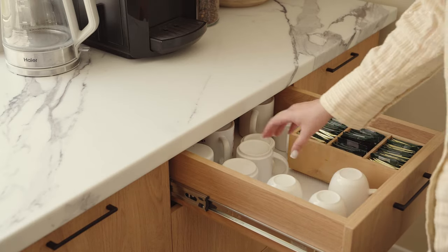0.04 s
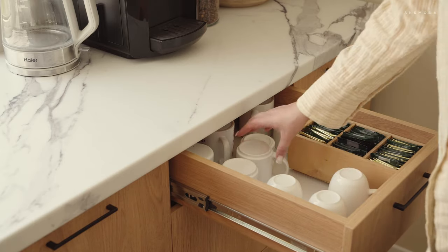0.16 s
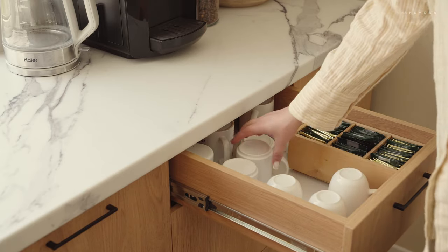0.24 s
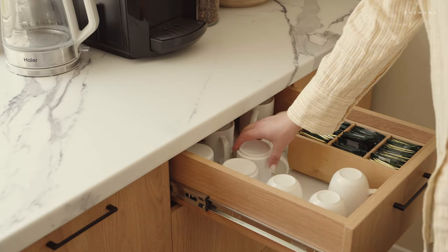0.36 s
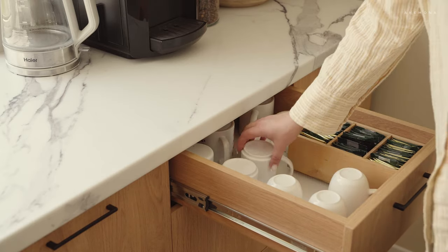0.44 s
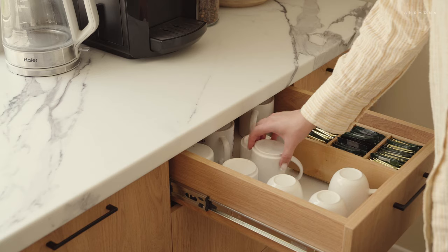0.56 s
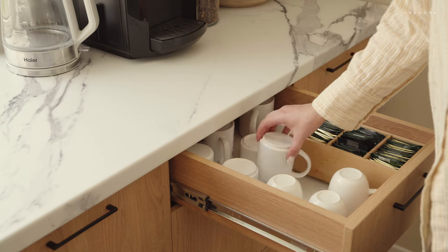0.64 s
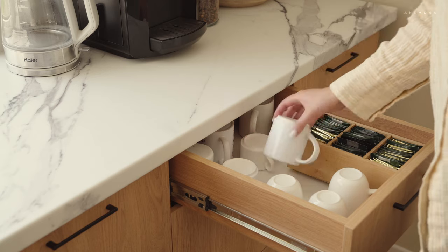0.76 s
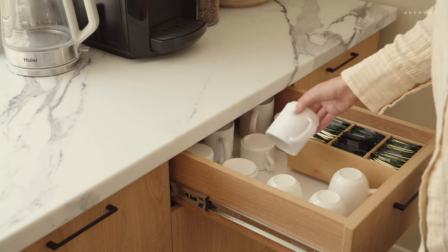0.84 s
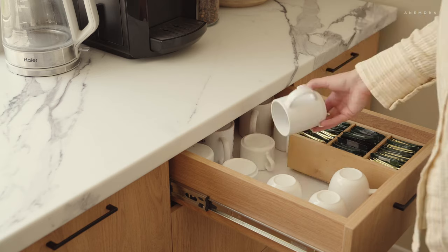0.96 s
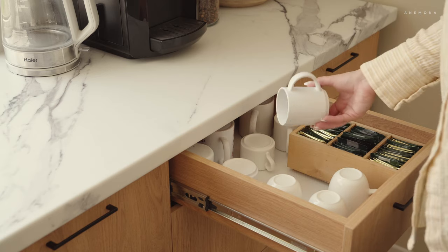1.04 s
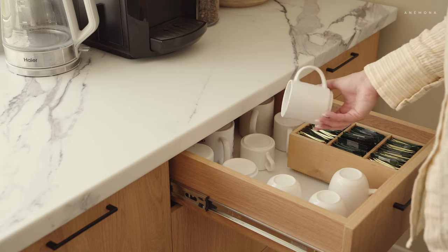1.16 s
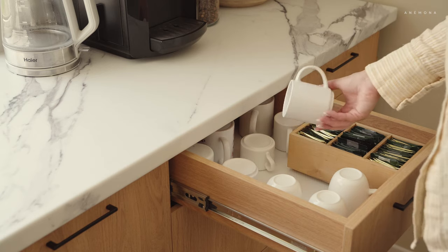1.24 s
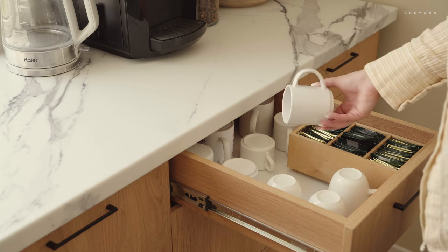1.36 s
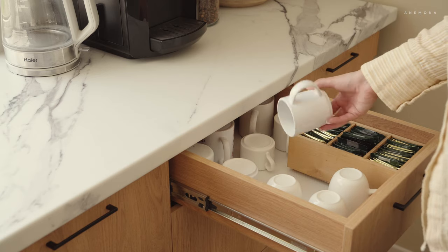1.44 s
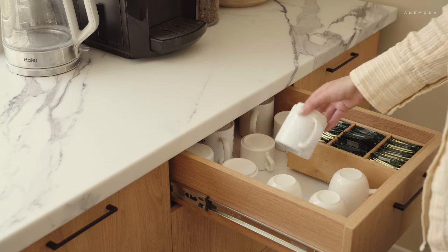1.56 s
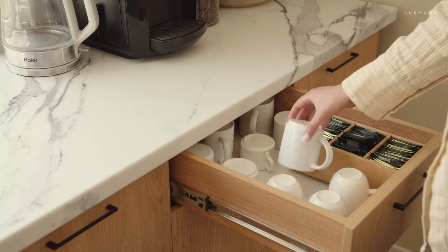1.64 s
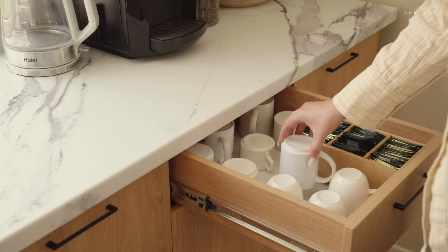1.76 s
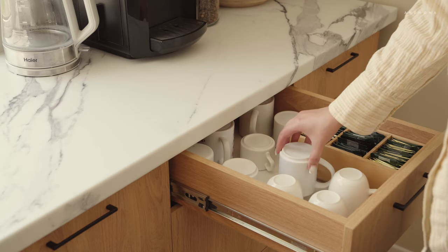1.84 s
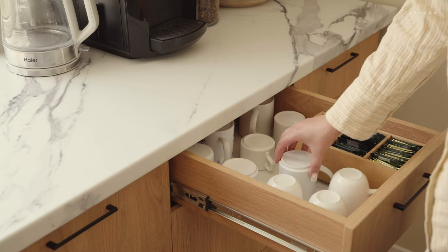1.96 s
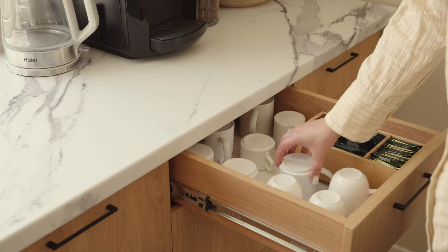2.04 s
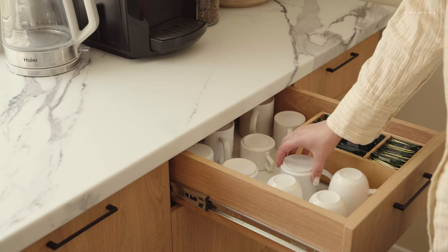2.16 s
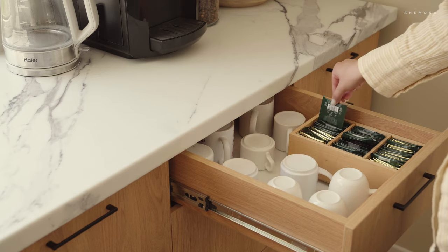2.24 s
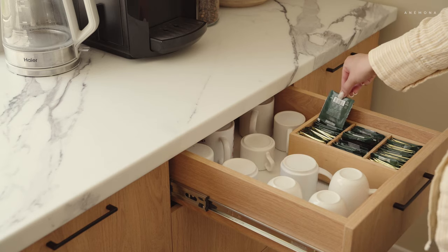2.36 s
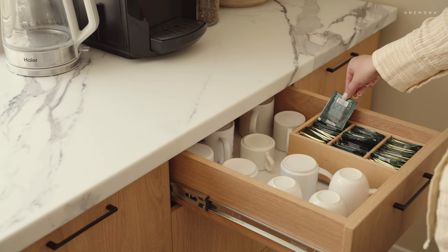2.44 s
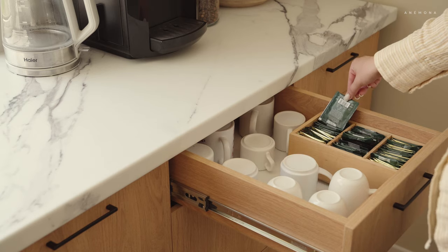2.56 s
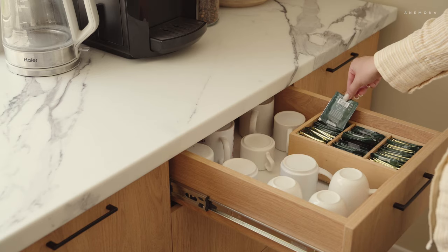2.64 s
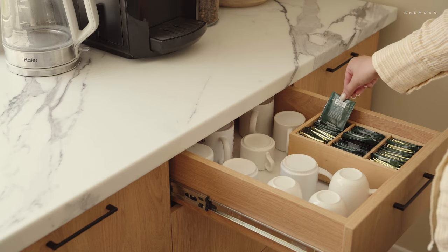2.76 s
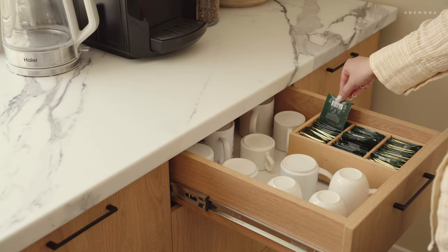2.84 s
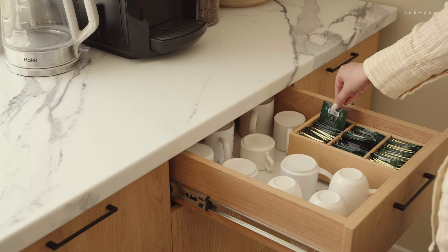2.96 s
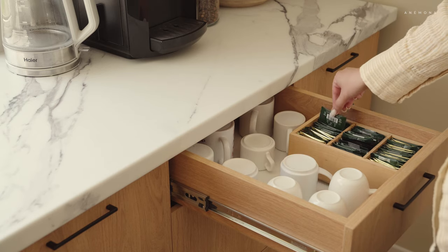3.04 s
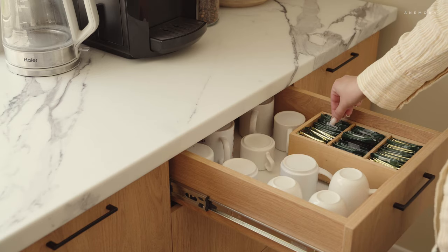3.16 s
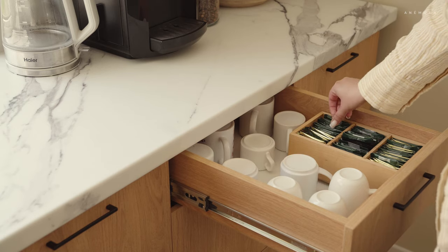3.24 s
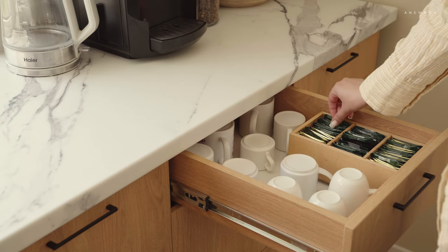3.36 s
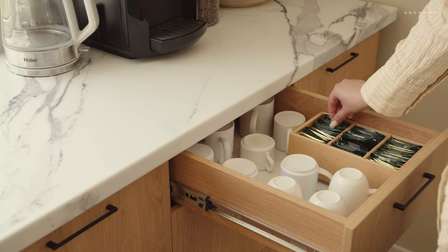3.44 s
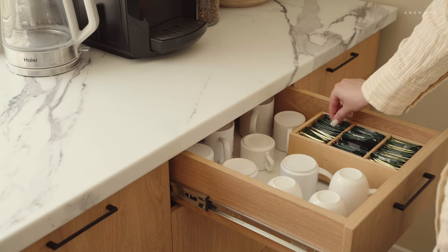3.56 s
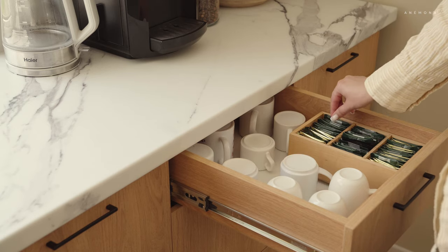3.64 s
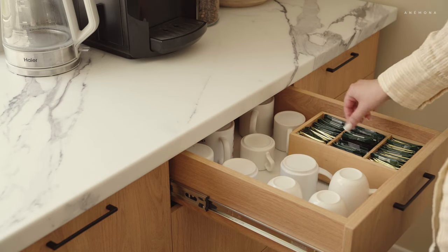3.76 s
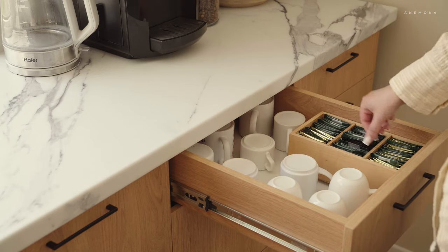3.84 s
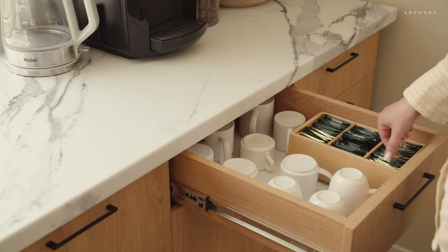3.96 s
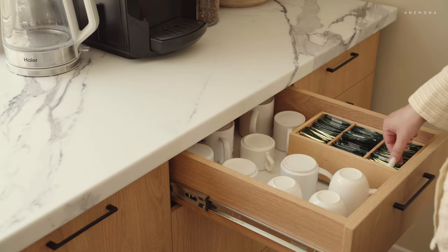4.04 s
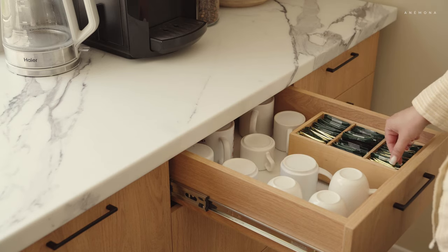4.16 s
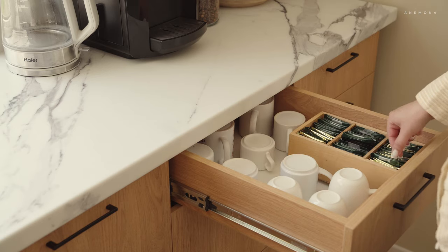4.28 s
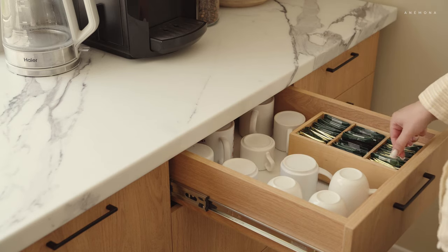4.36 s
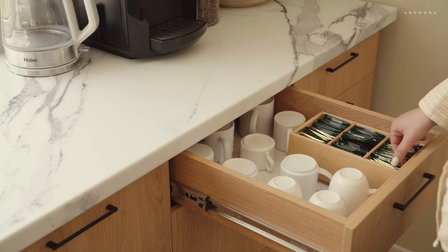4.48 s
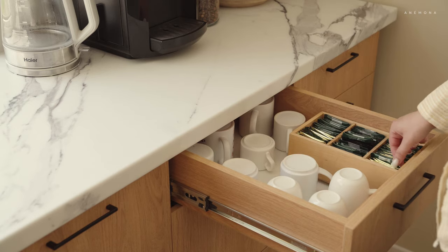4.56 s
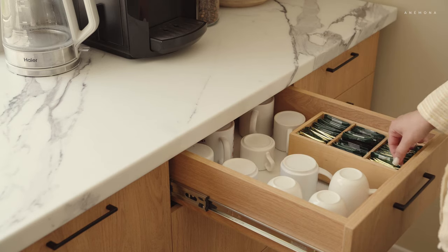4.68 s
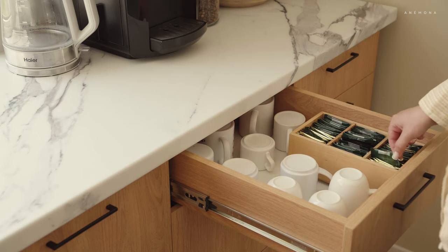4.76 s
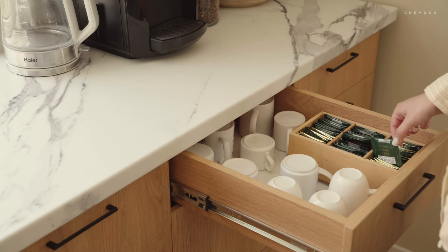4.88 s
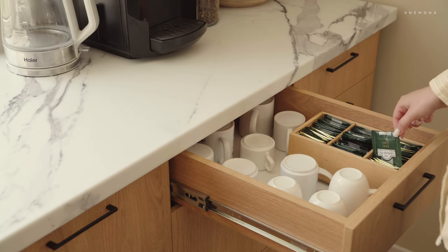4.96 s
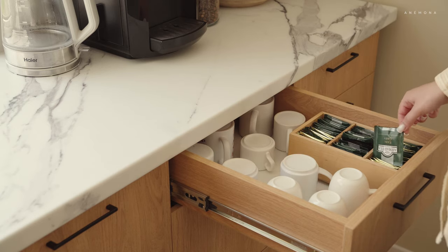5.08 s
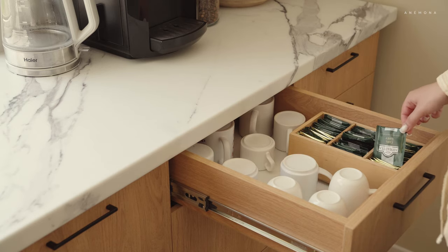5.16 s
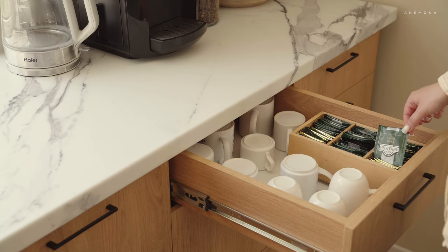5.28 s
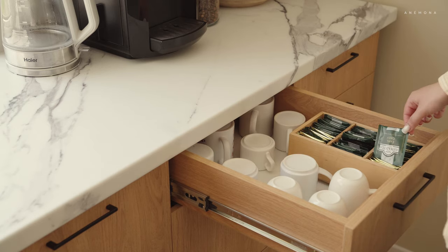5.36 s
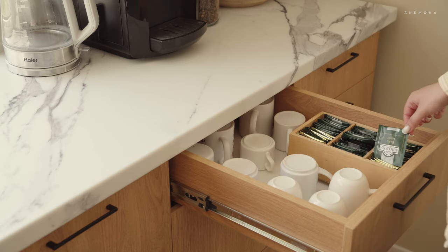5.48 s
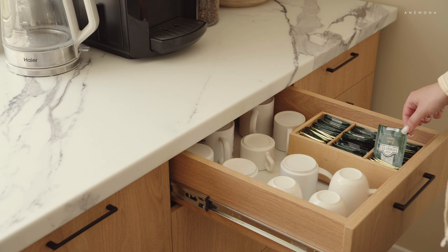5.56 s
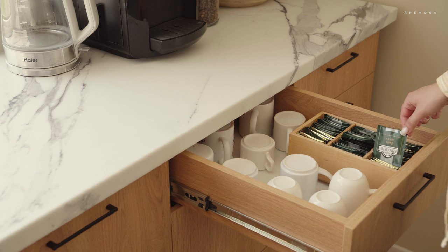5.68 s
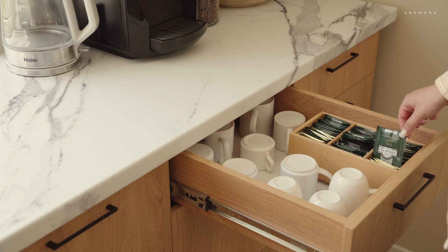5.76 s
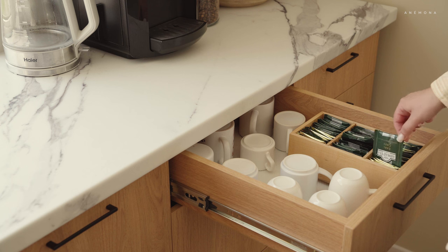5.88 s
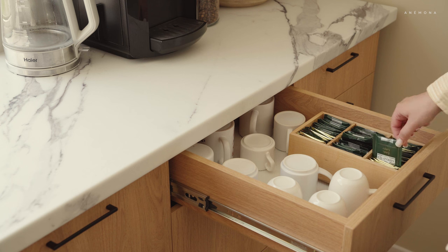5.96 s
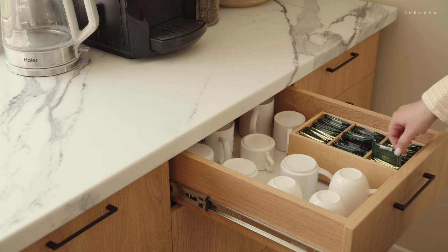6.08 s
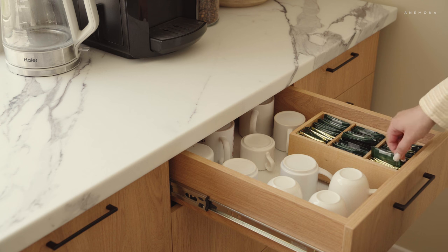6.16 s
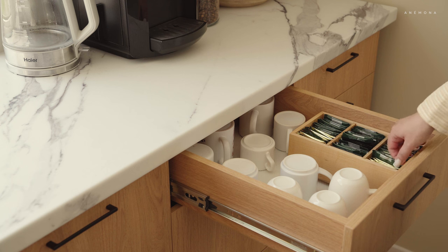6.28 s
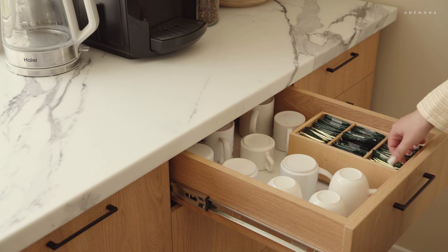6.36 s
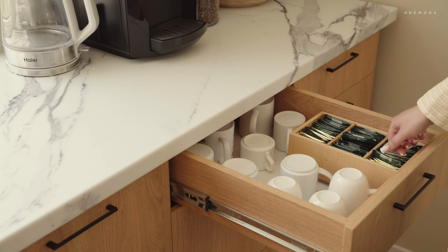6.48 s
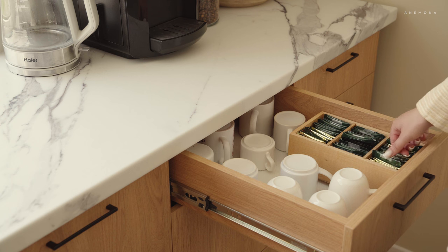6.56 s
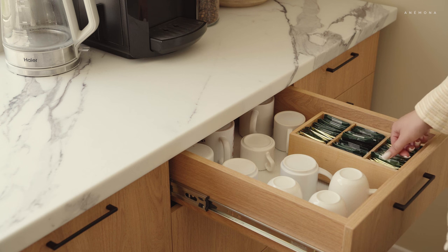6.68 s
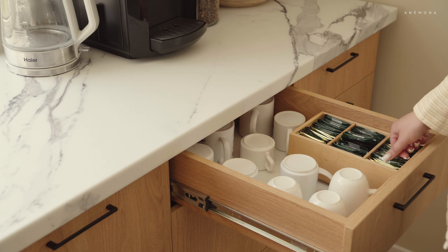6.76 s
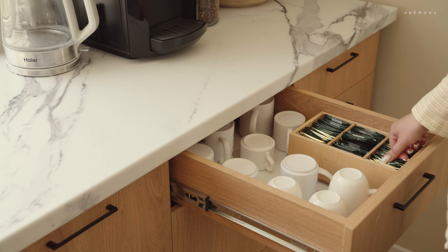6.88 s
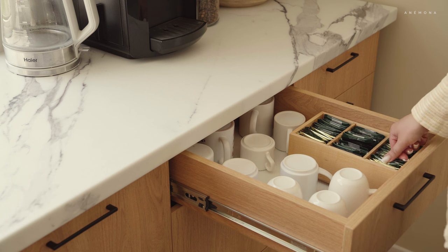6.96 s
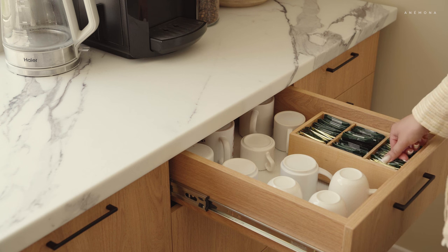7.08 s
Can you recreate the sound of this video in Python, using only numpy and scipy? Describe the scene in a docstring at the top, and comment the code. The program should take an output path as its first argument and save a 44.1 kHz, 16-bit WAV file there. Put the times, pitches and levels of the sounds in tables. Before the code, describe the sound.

Close stereo pickup of a wooden drawer in a lightly reverberant kitchen, over low room air and hum. A mug's foot rubs on wood, followed by near silence while it is held. It is put down in a rapid cluster of knocks, ringing against neighbouring cups, with a short low stutter as it settles. Crisp wrappers then rustle in separate strokes, with snapping creases and scuffs against the box, quieter between pulls.

```python
"""A small, hard kitchen with a faint appliance hum; the open drawer lies a little to the left.
A ceramic cup rubs over the wood and is lifted out of a wooden drawer, then set back: struck modes of china
and wood ring over noisy clatter, and a few stick-slip jerks judder on the drawer floor. Then fingers pull
tea sachets from a wooden box and push them back: filtered noise and grains slide and crackle, short
resonant pulses snap and bursts of noise scuff. Direct sound, close echoes and a room tail give distance."""
import sys
import numpy as np
from scipy import signal
from scipy.fft import rfft, irfft, next_fast_len
from scipy.io import wavfile

SR = 44100
rng = np.random.default_rng(int(sys.argv[2]) if len(sys.argv) > 2 else 0)


def master(y):
    """Save y as 16-bit WAV."""
    cut = np.clip(np.atleast_2d(y).T, -1, 1)
    pcm = np.round(cut * 32767)  # scale
    wavfile.write(sys.argv[1], SR, pcm.astype(np.int16))


N = 313627
TIME = np.arange(N) / SR  # s

# the room's air noise: (frequency [Hz], relative density [dB per Hz])
AIR_SPECTRUM = [(12, -51), (20, -2.5), (65, -9.5), (123, -8), (204, -3.5), (277, -7), (328, -10), (367, -8),
                (558, -12), (642, -12), (849, -14), (923, -14), (2020, -21.5), (14300, -33), (16000, -35)]
# how alike the air noise is at left and right: (frequency [Hz], likeness [-1 to 1])
AIR_LIKENESS = [(60, 0.94), (130, 0.91), (290, 0.66), (640, -0.14), (1410, -0.23), (3100, -0.027),
                (6820, 0.18), (15000, 0.2)]
# partials of the appliance hum: (centre frequency [Hz], level before the hum trim [dB])
HUM_PARTIALS = [(204.6, -65), (269.2, -68.5), (360.7, -67.5), (667.5, -72.5), (764.4, -83)]
# decay of the room's tail: (frequency [Hz], t60 [s])
ROOM_DECAY = [(200, 0.43), (700, 0.87), (2000, 0.82), (5000, 0.58), (10000, 0.53), (16000, 0.56)]
# how alike the room's reflections are at left and right: (frequency [Hz], likeness [-1 to 1])
ROOM_LIKENESS = [(100, 1), (300, 1), (700, 0.89), (2000, 0.62), (5000, 0.54), (9000, 0.22), (16000, 0.19)]
# the cup's foot rubbing over wood: (frequency [Hz], relative density [dB per Hz])
DRAG_SPECTRUM = [(50, -33), (90, -15), (135, 5), (200, -9), (280, 3.5), (350, 3), (450, -13.5), (560, -9.5),
                 (700, -20.5), (1150, -17), (1500, -28.5), (3000, -34), (6000, -60)]
# drawer floor damped by the pressed cup: (frequency [Hz], relative level [dB], t60 [s])
PRESSED_FLOOR_MODES = [(144, -11, 0.12), (217, -1.5, 0.058), (256.5, 6, 0.041), (580, -10, 0.098),
                       (687, -10.5, 0.039), (1310, -14, 0.029)]
# contacts of the landing cup:
# (time [s], relative blow on wood [dB], relative blow on china [dB], contact softness corner [Hz])
CUP_CONTACTS = [(1.8716, 2, -5, 3200), (1.8765, -5, -11.5, 12000), (1.8811, -4.5, 0, 7600),
                (1.898, -5, -16, 14000)]
# ring of the cups, some modes in beating pairs:
# (frequency [Hz], level before colour [dB], t60 before shortening [s])
CHINA_MODES = [(1618, -15, .35), (1842, -15, .35), (2139, -10, .65), (2159, -7, .65), (2248, -3, .55),
               (2275, -7, .45), (2554, 0, .72), (2563, -7, .35), (2692, -16, .35), (2802, -15, .5),
               (4503, -13, .45), (4792, -22, .35), (5917, 1, .16), (5933, -7, .38), (6010, -16, .2),
               (6953, -22, .35), (7125, -16, .25), (7170, -14, .24), (7620, -24, .28), (9860, -20, .22),
               (9905, -22, .25), (10293, -23, .3), (10391, -25, .3), (11030, -27, .2), (11380, -23, .3),
               (11980, -25, .22), (12570, -25, .3), (13060, -20, .22)]
# how strongly the contacts excite the china: (frequency [Hz], gain [dB])
CHINA_EXCITATION = [(1800, 3), (2200, -2), (2600, 1), (4500, -3.5), (6000, 1.5), (7300, 9.5), (12000, 10.5)]
# ring of the loaded drawer: (frequency [Hz], relative level [dB], t60 [s])
DRAWER_MODES = [(138, -7, .3), (325, -3, .28), (373, -9, .5), (585, -3, .3), (708, -4, .42), (770, -9, .5),
                (813, -3, .38), (920, -7, .45), (1030, -7, .42), (1136, -10, .45), (1292, -11, .45)]
# dense, short clatter of the landing: (frequency [Hz], relative density [dB per Hz])
KNOCK_SPECTRUM = [(50, -27), (110, -13), (300, -2), (450, -4), (750, -4), (1250, -5.5), (1700, -14.5),
                  (2300, -2), (2750, -3.5), (3200, -29.5), (5300, -31), (7400, -16), (8700, -47),
                  (10500, -30), (16000, -37)]
# grit under the cup's foot: (frequency [Hz], relative density [dB per Hz])
GRIT_SPECTRUM = [(60, -24), (160, 1), (300, 5), (600, 2), (900, -3), (1300, -16), (2000, -12), (3200, -28),
                 (6000, -40)]
# sachet strokes against neighbours:
# (start [s], swell [s], hold [s], level before band trims [dB], brightness tilt [dB])
SACHET_STROKES = [(2.253, 0.014, 0.067, -51.5, 5), (2.339, 0.013, 0.0093, -48, -7),
                  (2.75, 0.016, 0.078, -63.5, -2), (2.866, 0.051, 0.018, -48.5, 6),
                  (3.053, 0.12, 0.077, -51, -1), (3.449, 0.18, .035, -53.5, 2.5),
                  (4.132, .02, 0.14, -61.5, -3), (4.588, 0.016, 0.2, -61.5, -5),
                  (4.721, 0.23, 0.028, -42, 3), (5.03, 0.052, 0.026, -58, -8),
                  (5.248, 0.055, .05, -63.5, -6.5), (5.682, 0.33, .06, -49.5, 1.5),
                  (6.08, 0.15, 0.11, -50, 0), (6.606, 0.072, 0.12, -64.5, -2.5),
                  (6.818, .04, 0.11, -58.5, -5)]
# sliding wrapper paper: (frequency [Hz], relative density [dB per Hz])
PAPER_SPECTRUM = [(150, -25), (300, -22), (500, 15.5), (750, 11), (1100, 4.5), (1640, -6), (2100, -3),
                  (2650, -7), (3830, -6.5), (6000, -12), (9090, -11.5), (16000, -13.5)]
# creases that snap; the row at 2.358 s is a bright echo of the first snap: (time [s], level [dB], ring #
# frequency [Hz], treble tilt [dB])
CREASE_SNAPS = [(2.3533, -14, 835, -4), (2.358, -17.5, 5830, -10.5), (2.5381, -26, 1260, -5.5),
                (2.897, -18.5, 2140, -6.5), (2.9753, -17, 2070, -12), (3.1319, -18.5, 2110, 0),
                (3.1898, -23, 3860, -6), (3.3233, -17, 2020, -5), (3.3876, -25, 1460, -7),
                (3.6483, -33, 2070, 8), (3.6814, -35, 1900, 27), (4.146, -36.5, 2930, -11),
                (4.2986, -36, 902, -1), (4.599, -38, 2160, -4), (4.819, -28.5, 1310, -3),
                (4.933, -19, 2970, -7), (5.0399, -16.5, 3900, -3), (5.1873, -23, 1110, -3.5),
                (5.363, -30.5, 1100, -8), (6.047, -14, 2880, -1.5), (6.4443, -22, 4800, -11.5),
                (6.8728, -31.5, 3100, -15), (6.9636, -32.5, 3000, -11)]
# common colour of the snaps: (frequency [Hz], relative density [dB per Hz])
SNAP_SPECTRUM = [(100, -55), (300, -12), (500, -7.5), (800, -8.5), (2000, 1), (3500, -0.5), (6000, 3),
                 (9000, 0), (16000, -13)]
# a wrapper catches and chatters on an edge:
# (time [s], stroke length [s], resonance [Hz], width at half amplitude [Hz], level before trim [dB])
EDGE_SCUFFS = [(2.928, 0.018, 4030, 3000, -45), (3.188, 0.017, 1580, 1800, -43),
               (3.67, 0.03, 13000, 3500, -56), (4.145, 0.0051, 2600, 3000, -53),
               (4.817, 0.014, 1370, 2000, -43.5), (4.877, 0.013, 2070, 1200, -38),
               (4.911, 0.04, 2740, 1800, -39), (4.958, 0.032, 3870, 720, -35),
               (5.039, 0.02, 580, 161, -42.5), (5.125, 0.014, 1530, 1250, -32.5),
               (5.796, 0.32, 6360, 3000, -59), (6.193, 0.011, 2860, 6000, -37),
               (6.267, 0.013, 1960, 1400, -41), (6.349, 0.074, 275, 50, -47),
               (6.452, 0.012, 4860, 1500, -60)]

AIR_DB = -54.5
# the cup drags ever harder until it lifts off
DRAG_S, DRAG_SWELL_S, DRAG_HOLD_S, DRAG_T60, DRAG_DB = 0.43, 0.12, 0.013, 0.67, -39
SWELL_POWER = 1.46  # friction grows with this power of time as the hand speeds up
# the settled cup leans on its neighbour and stops ringing
LET_GO_S, DAMPED_T60 = 2.245, .14
# the pressed cup slips in evenly timed jerks that weaken toward the last
JUDDER_S, JERK_EVERY_S, JERK_FADE_DB = 2.1839, .0143, -8.5
# a patch that rings at 2 kHz; smaller, higher patches ring less
RING_DB, RING_DB_PER_OCTAVE = 8.5, -3
CRUMPLE_S = .0011  # decay time of a snap's spread direct click
EDGE_HZ = 16000  # upper band limit of the recorder


def amp(db):
    """Decibels to gain."""
    return 10 ** (np.asarray(db) / 20)


def evened(x):
    """Scales to an rms of one."""
    return x / np.sqrt(np.mean(x ** 2) + 1e-20)


def read(points, hz):
    """Reads a table on a log-frequency axis."""
    f, value = np.transpose(points)
    return np.interp(np.log(hz + 1), np.log(f + 1), value)


def add(mix, s, sound):
    """Mixes a sound in at time s, cut off at the end of the mix."""
    part = mix[..., round(s * SR):][..., :sound.shape[-1]]
    part += sound[..., :part.shape[-1]]


def shaped(x, gain):
    """Filters by a gain given as a function of frequency."""
    size = next_fast_len(x.shape[-1])
    spectrum = rfft(x, size) * gain(np.fft.rfftfreq(size, 1 / SR))
    return irfft(spectrum, size)[..., :x.shape[-1]]


def paired(x, alike):
    """Turns two unrelated signals into a left and right of given likeness."""
    mid = shaped(x[0], lambda f: np.sqrt((1 + read(alike, f)) / 2))
    side = shaped(x[1], lambda f: np.sqrt((1 - read(alike, f)) / 2))
    return np.array([mid + side, mid - side])


def causal(colour_db, size=2048):
    """The sharpest (minimum-phase) pulse of unit energy that has this spectrum."""
    log_gain = np.log(amp(colour_db(np.abs(np.fft.fftfreq(size, 1 / SR)))))
    pulse = np.fft.ifft(np.exp(np.conj(signal.hilbert(log_gain)))).real[:size // 2]
    return pulse / np.linalg.norm(pulse)


def wander(rate_hz, size=N):
    """Slow random fluctuation of rms one."""
    return evened(shaped(rng.standard_normal(size), lambda f: np.exp(-(f / rate_hz) ** 2)))


def through(x, response):
    """Convolves a sound with a stereo response."""
    return signal.fftconvolve(np.atleast_2d(x), response, axes=1)[:, :N]


def kitchen(near_db, tail_db, size=36000):
    """Direct sound, a cluster of echoes from drawer and worktop, then the room's tail."""
    t = np.arange(size) / SR
    taps = rng.standard_normal((2, size)) * (rng.random((2, size)) < .25)
    hz, at, z = signal.stft(taps, SR, nperseg=256)
    decay = amp(-60 * at / read(ROOM_DECAY, hz)[:, None])  # each frequency dies at its own pace
    tail = signal.istft(z * decay, SR, nperseg=256)[1][:, :size]
    tail *= np.clip((t - .004) / 0.0039, 0, 1)
    first_echo = np.exp(-((t - .0048) / .0006) ** 2)
    second_echo = .75 * np.exp(-((t - .0072) / .0015) ** 2)
    near = taps * (first_echo + second_echo)
    echoes = amp(near_db) * evened(near) + amp(tail_db) * evened(tail)
    response = paired(echoes / np.sqrt(size), ROOM_LIKENESS)
    response[:, 0] += 1  # direct sound
    return response


def gesture(start, swell, hold, t60):
    """Gain of one movement: it swells, holds and dies away."""
    t = TIME - start
    rise = np.clip(t / swell, 0, 1) ** SWELL_POWER
    return rise * amp(-60 * np.maximum(t - swell - hold, 0) / t60)


def room_noise(hum_db=-1, waver_hz=2.525, flutter=0.55):
    """Steady air noise, and appliance hum whose partials waver in pitch and level."""
    air = shaped(paired(rng.standard_normal((2, N)), AIR_LIKENESS), lambda f: amp(read(AIR_SPECTRUM, f)))
    hum = np.zeros(N)
    for hz, db in HUM_PARTIALS:
        level = amp(db) * (1 + flutter * wander(2.1))
        pitch = hz + waver_hz * wander(10.0)
        hum += level * np.sin(2 * np.pi * np.cumsum(pitch) / SR)
    return amp(AIR_DB) * evened(air) + amp(hum_db) * np.sqrt(2) * hum


def thud(rise_s, low_hz=125, order=4, size=8192):
    """A soft push rings the damped drawer floor, which is too small to radiate deep bass."""
    t = np.arange(size) / SR
    modes = sum(amp(db - 60 * t / t60) * np.sin(2 * np.pi * hz * t) for hz, db, t60 in PRESSED_FLOOR_MODES)
    highpass = signal.butter(order, low_hz, "high", fs=SR, output="sos")
    return signal.sosfilt(highpass, modes * (1 - np.exp(-(t / rise_s) ** 2)))


def drag(bump_s=.5585, bump_db=-33):
    """The cup's foot rubs over the wood as swelling noise and bumps once as it lifts off."""
    noise = paired(rng.standard_normal((2, N)), ROOM_LIKENESS)
    rub = shaped(noise, lambda f: amp(read(DRAG_SPECTRUM, f)))
    out = evened(rub) * amp(DRAG_DB) * gesture(DRAG_S, DRAG_SWELL_S, DRAG_HOLD_S, DRAG_T60)
    bump = through(thud(rise_s=0.0013), kitchen(near_db=-4, tail_db=-2))
    add(out, bump_s, amp(bump_db) * bump)
    return out


def struck(modes, blows, room, rise_cycles):
    """Modes swell over their first cycles, take energy from every blow and sound through the room."""
    start, t = blows[0][0], np.arange(SR) / SR
    out = np.zeros((2, N))
    for hz, db, t60 in modes:
        power = 0
        for s, blow_db, soft_hz in blows:
            since = t - s + start
            decay = amp(blow_db - 60 * np.maximum(since, 0) / t60) ** 2
            power += (since >= 0) * decay / (1 + (hz / soft_hz) ** 4)  # soft contacts spare high modes
        swell = 1 - np.exp(-t * hz / rise_cycles)
        mode = np.sqrt(power) * swell * np.sin(2 * np.pi * hz * t)
        # the room colours the mode but keeps its level
        add(out, start, amp(db) * np.std(mode) * evened(through(mode, room)[:, :SR]))
    return out


def landing(china_db=-26, wood_db=-32, knock_db=-7, rattle_db=-2, rattle_s=0.0048, ring_share=0.81):
    """The cup hits the drawer floor and its neighbours: china and wood ring over a dense clatter."""
    room = kitchen(near_db=-1.5, tail_db=-0.5)
    modes = [(hz, db + read(CHINA_EXCITATION, hz), t60 * ring_share) for hz, db, t60 in CHINA_MODES]
    china_blows = [(s, db, soft_hz) for s, _, db, soft_hz in CUP_CONTACTS]
    china = struck(modes, china_blows, room, rise_cycles=2.2)
    china *= amp(-60 * np.maximum(TIME - LET_GO_S, 0) / DAMPED_T60)
    wood_blows = [(s, db, soft_hz) for s, db, _, soft_hz in CUP_CONTACTS]
    wood = struck(DRAWER_MODES, wood_blows, room, rise_cycles=1.8)
    clatter, t = np.zeros((2, N)), np.arange(4096) / SR
    for s, db, _, _ in CUP_CONTACTS:
        rattle = rng.standard_normal(len(t)) * np.exp(-t / rattle_s)  # the foot chatters after each contact
        force = amp(rattle_db) * rattle / np.linalg.norm(rattle) + (t == 0)
        knock = signal.fftconvolve(force, causal(lambda f: read(KNOCK_SPECTRUM, f)))
        add(clatter, s, amp(db) * through(knock, kitchen(near_db=4.0, tail_db=6.5)))
    return amp(china_db) * china + amp(wood_db) * wood + amp(knock_db) * clatter


def judder(level_db=-19, grit_db=-32.0, grit_s=0.014, uneven_db=2, count=6):
    """Stick and slip: each jerk pushes the drawer floor and grinds briefly over it."""
    push, t = thud(rise_s=0.0034), np.arange(2048) / SR
    grind = 2 * t / grit_s * np.exp(-(t / grit_s) ** 2)
    out = np.zeros(N)
    for k in range(count):
        s = JUDDER_S + k * JERK_EVERY_S
        db = JERK_FADE_DB * (k / (count - 1)) ** 3 + uneven_db * rng.uniform(-1.5, 1)
        grit = evened(shaped(rng.standard_normal(len(t)), lambda f: amp(read(GRIT_SPECTRUM, f))))
        add(out, s, amp(level_db + db) * push)
        add(out, s, amp(grit_db + db) * grit * grind)
    return out


def slides(rub_db=-3.0, fizz_db=-14.0, release_t60=0.87, grains_per_s=1500, spread_db=4, smooth=0.36,
           catch_db=1.8, catch_hz=35):
    """Wrappers slide: fine hiss and tiny unequal crackles; bright strokes trade low rub for high fizz."""
    sizes = amp(spread_db * np.minimum(rng.exponential(1, N), 3.5)) * rng.choice([-1, 1], N)
    crackle = evened(sizes * (rng.random(N) < grains_per_s / SR))
    grains = crackle + smooth * rng.standard_normal(N)
    coloured = shaped(grains, lambda f: amp(read(PAPER_SPECTRUM, f)))
    paper = through(coloured, kitchen(near_db=7.5, tail_db=6.0))
    power = np.zeros((3, N))
    for start, swell, hold, db, bright_db in SACHET_STROKES:
        bands = amp([[db + rub_db - bright_db], [db], [db + fizz_db + bright_db]])
        power += (bands * gesture(start, swell, hold, release_t60)) ** 2
    edges = [(350, 1800), (1800, 7000), (7000, 20000)]  # rub, middle and fizz bands, Hz
    out = np.zeros((2, N))
    for (lo, hi), level in zip(edges, np.sqrt(power)):
        band = shaped(paper, lambda f: np.sqrt(1 / (1 + (f / hi) ** 10) - 1 / (1 + (f / lo) ** 10)))
        out += evened(band) * level
    return out * amp(catch_db * wander(catch_hz))  # the wrappers catch and slip unevenly


def snaps(ring_octaves=0.19, body_db=5, direct=0.77):
    """A crease buckles within about a millisecond and rings its patch of wrapper."""
    out, t = np.zeros((2, N)), np.arange(256) / SR
    for s, db, hz, treble_db in CREASE_SNAPS:
        ring_db = RING_DB + RING_DB_PER_OCTAVE * np.log2(hz / 2000)
        pulse = causal(lambda f: read(SNAP_SPECTRUM, f)
                       + ring_db * np.exp(-(np.log2((f + 1) / hz) / ring_octaves) ** 2)
                       + treble_db * read([(4000, 0), (10000, 1)], f)
                       + body_db * read([(900, 1), (2000, 0)], f))
        crumple = paired(rng.standard_normal((2, len(t))), ROOM_LIKENESS) * np.exp(-t / CRUMPLE_S)
        response = kitchen(near_db=4.0, tail_db=6.5)
        response[:, 0] *= direct
        add(response, 0, crumple / np.linalg.norm(crumple[0]))  # the direct click is spread over the crumple
        add(out, s, amp(db) * through(pulse, response))
    return out


def scuffs(level_db=-3):
    """Short bursts of friction in one resonance of a wrapper or the box, each dying away with the room."""
    out, size = np.zeros((2, N)), SR
    room_power = kitchen(near_db=-10.5, tail_db=-1)[0] ** 2
    for s, length, hz, width, db in EDGE_SCUFFS:
        noise = paired(rng.standard_normal((2, size)), ROOM_LIKENESS)
        chatter = shaped(noise, lambda f: 1 / (1 + (2 * (f - hz) / width) ** 2))
        stroke = signal.windows.tukey(max(int(length * SR), 64), .3)
        swell = np.sqrt(np.abs(signal.fftconvolve(stroke ** 2, room_power)))[:size]
        add(out, s, amp(level_db + db) * evened(chatter)[:, :len(swell)] * swell)
    return out


def scene(lean_db=0.06):
    """Cup, sachets and room; the drawer lies a little to the left."""
    handling = drag() + landing() + judder() + slides() + snaps() + scuffs()
    return room_noise() + handling * amp([[lean_db], [-lean_db]])


def record(dry):
    """The recorder's band limit: a linear-phase lowpass."""
    lowpass = signal.firwin(511, EDGE_HZ, window=("kaiser", 9), fs=SR)
    return signal.oaconvolve(dry, lowpass[None], "same")


dry = scene()
out = record(dry)
master(out)
```